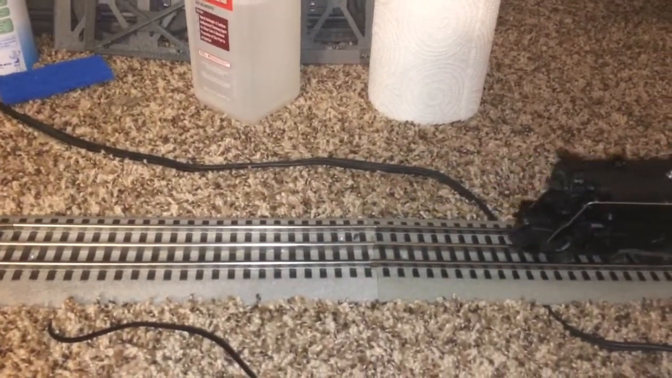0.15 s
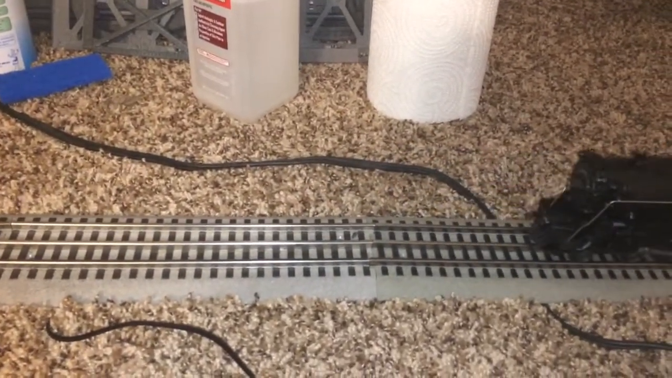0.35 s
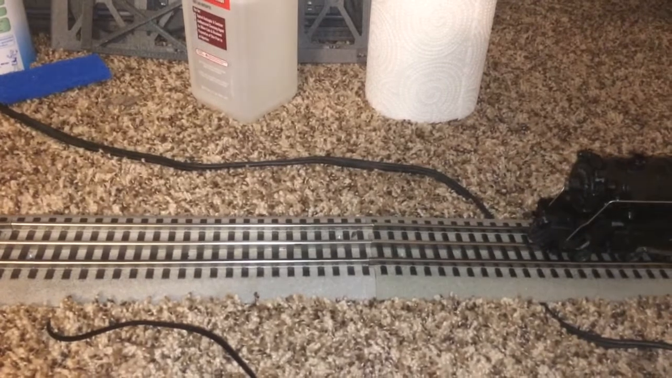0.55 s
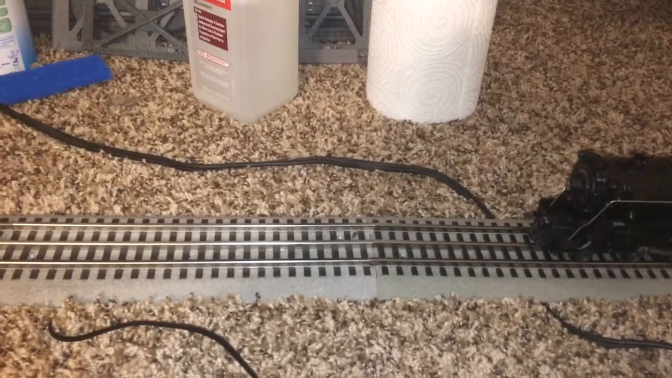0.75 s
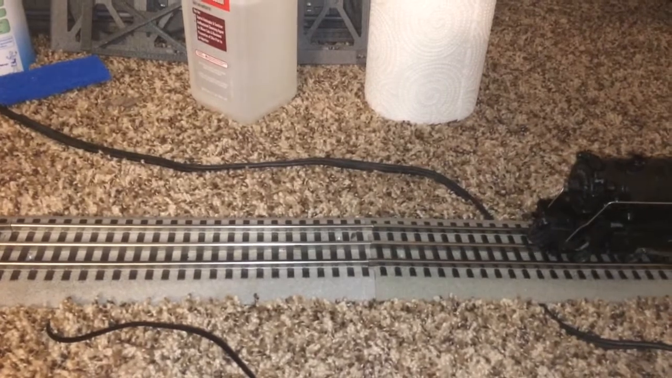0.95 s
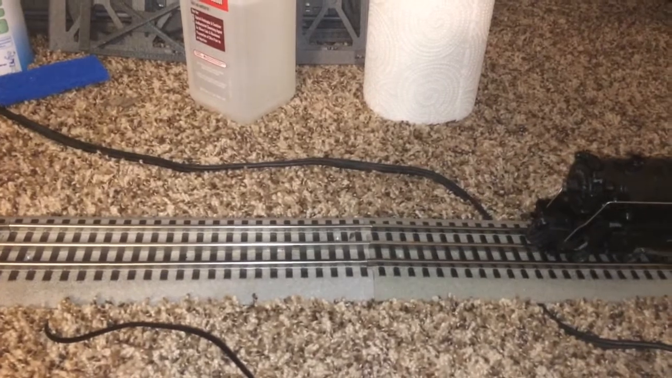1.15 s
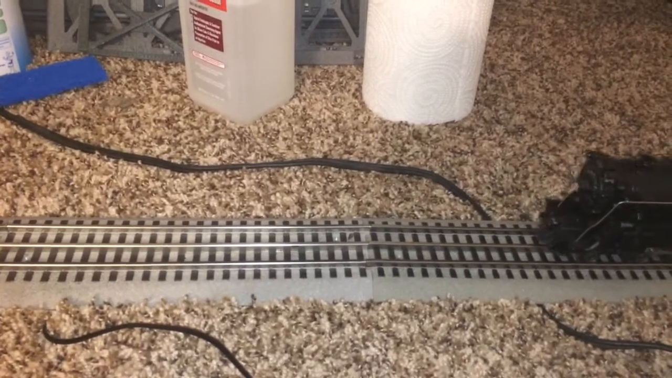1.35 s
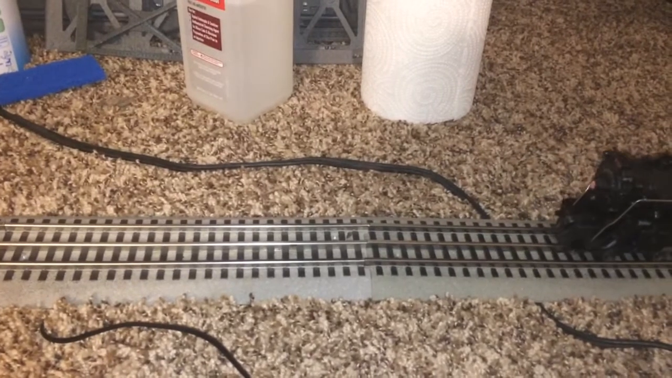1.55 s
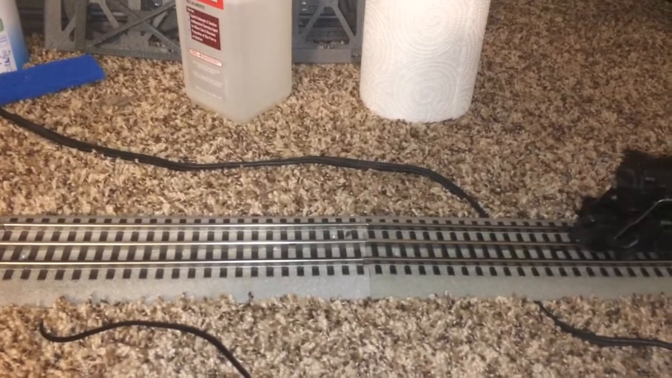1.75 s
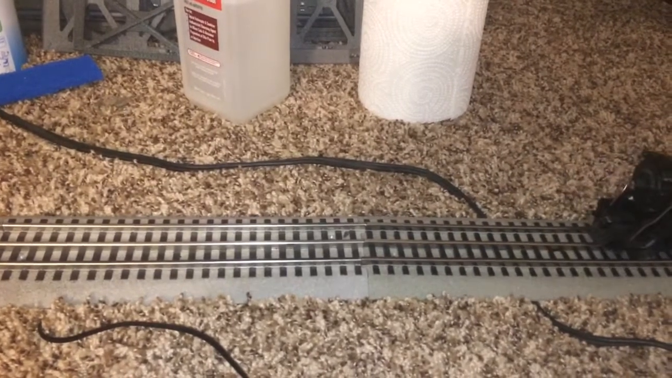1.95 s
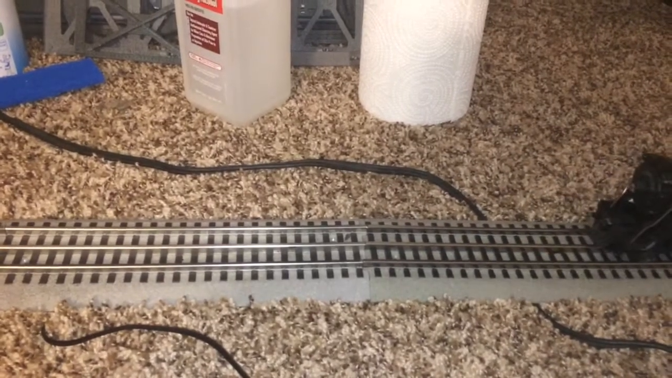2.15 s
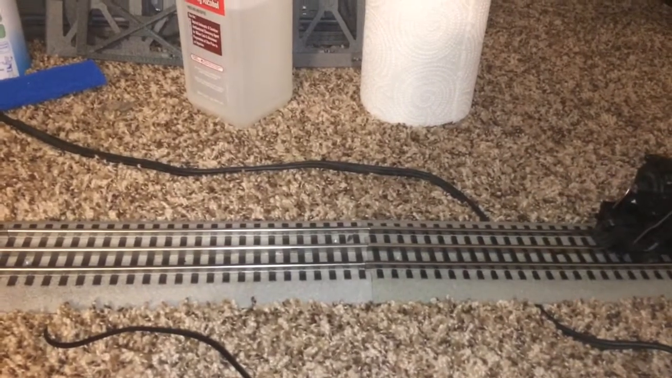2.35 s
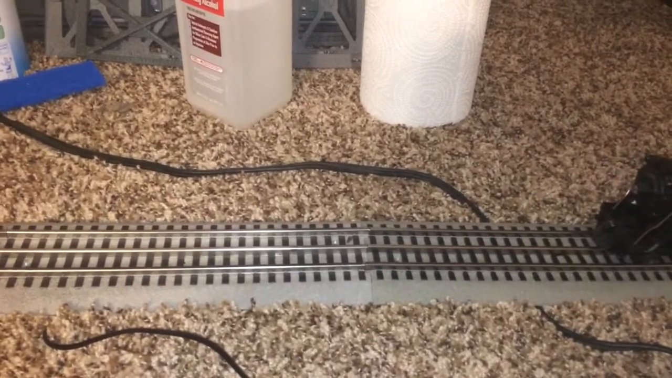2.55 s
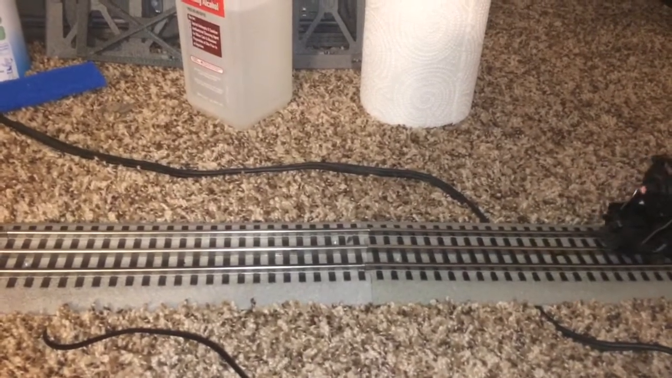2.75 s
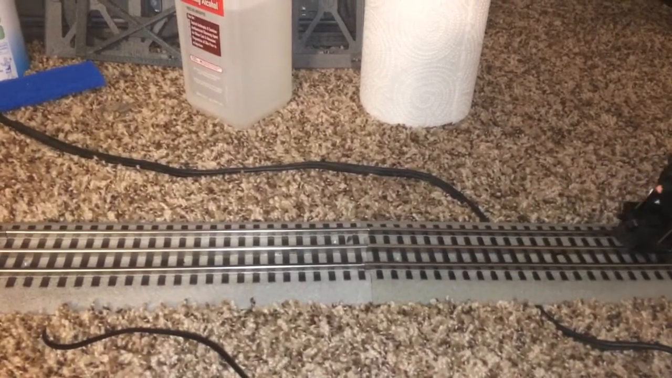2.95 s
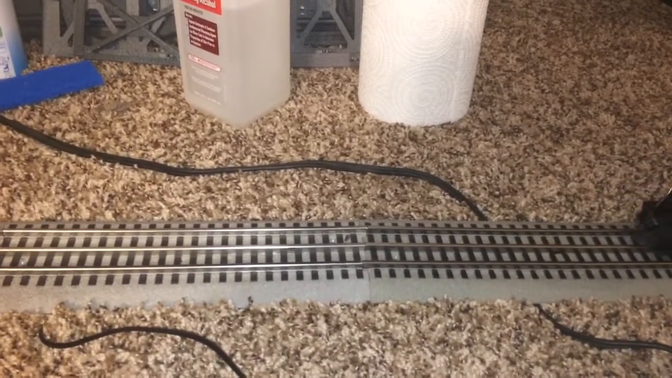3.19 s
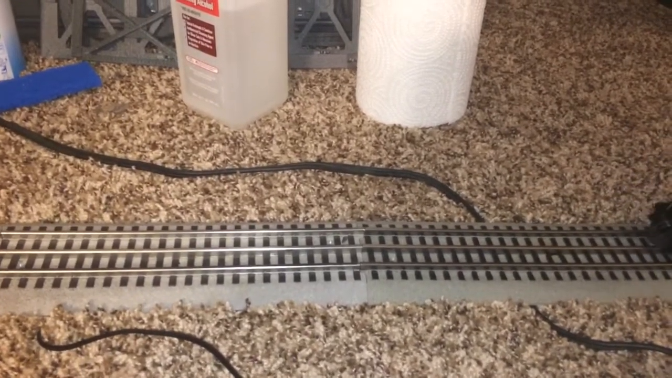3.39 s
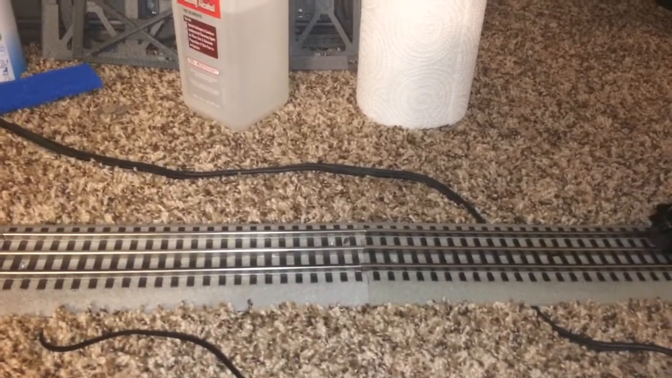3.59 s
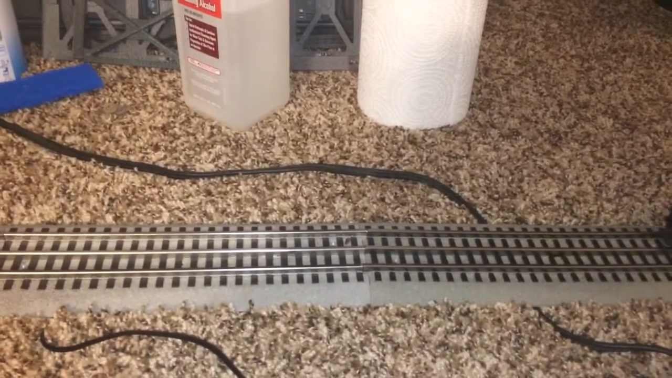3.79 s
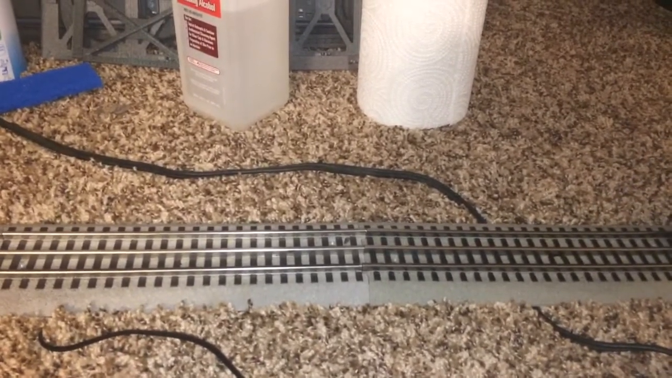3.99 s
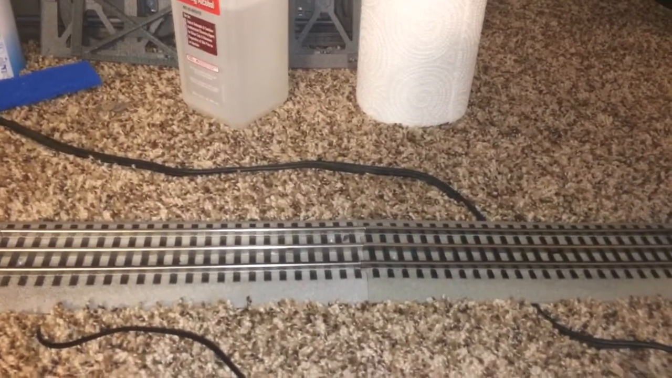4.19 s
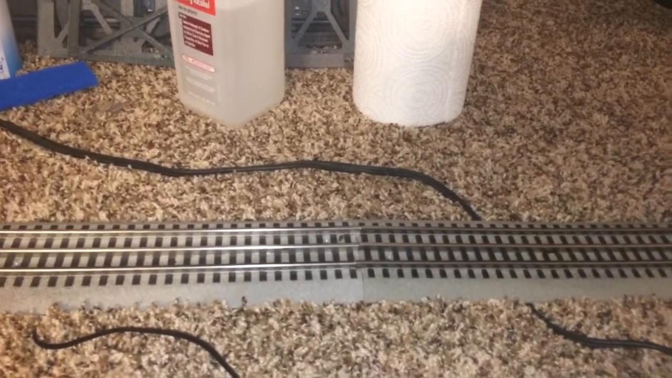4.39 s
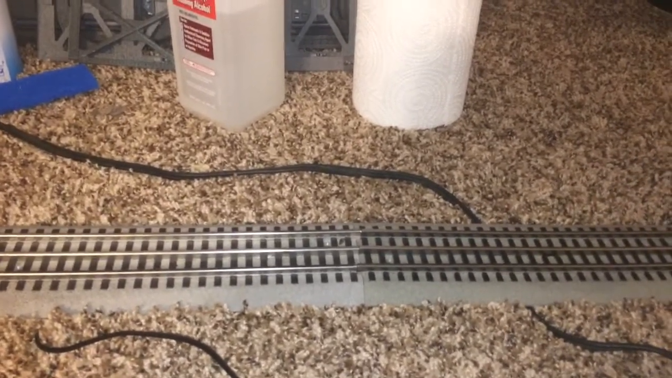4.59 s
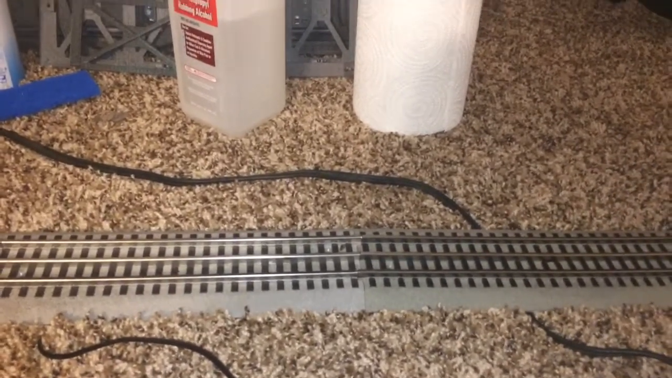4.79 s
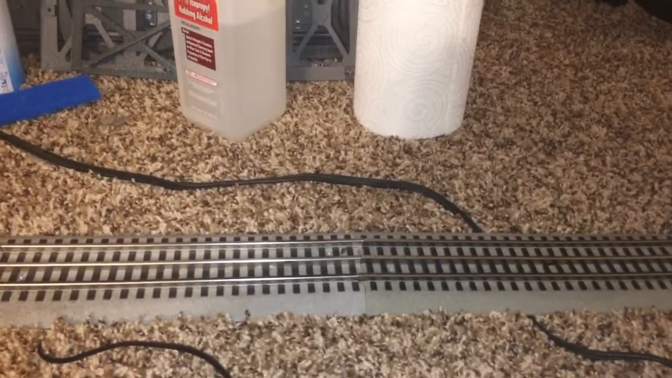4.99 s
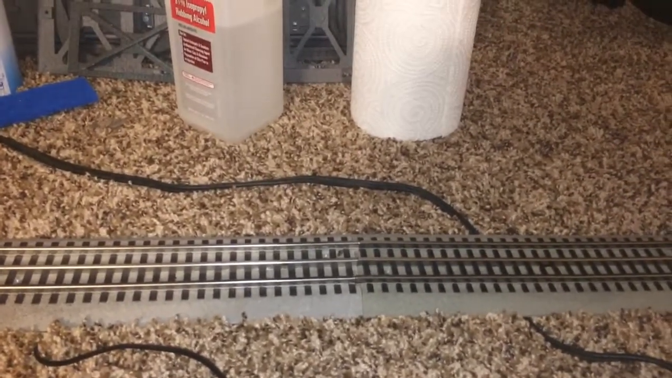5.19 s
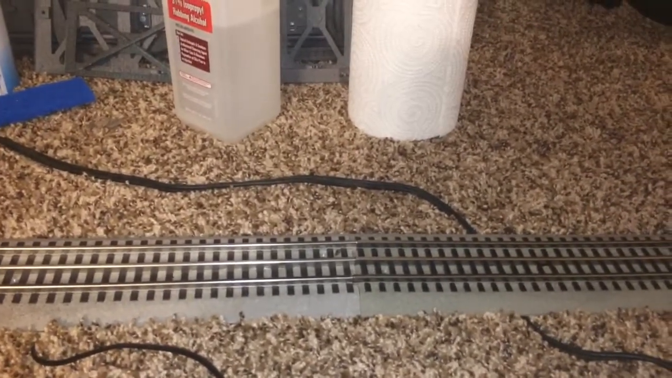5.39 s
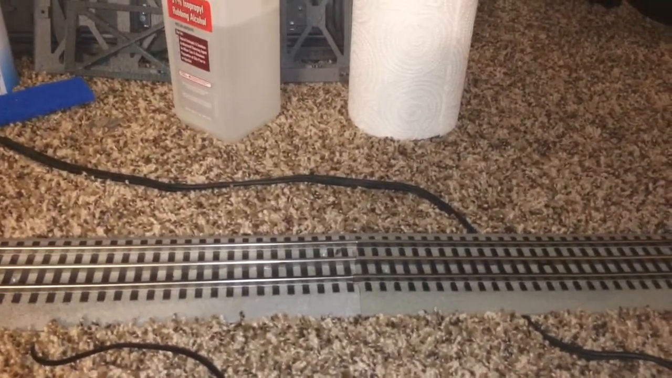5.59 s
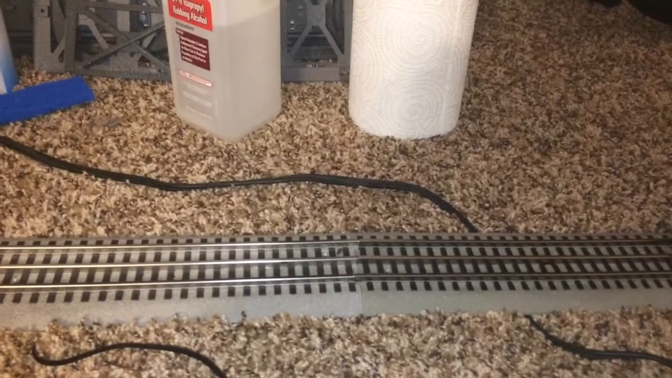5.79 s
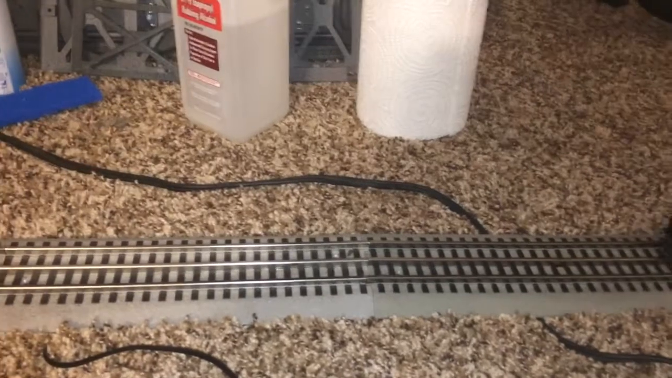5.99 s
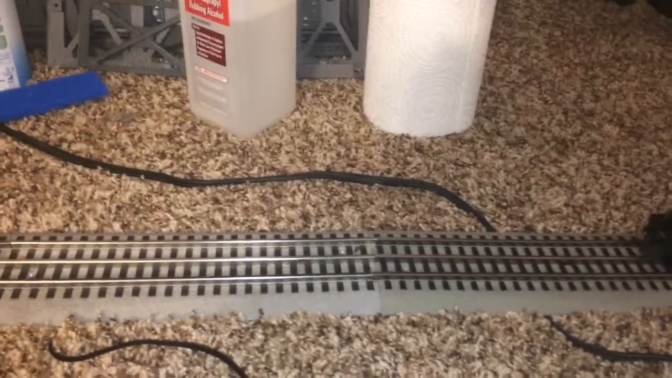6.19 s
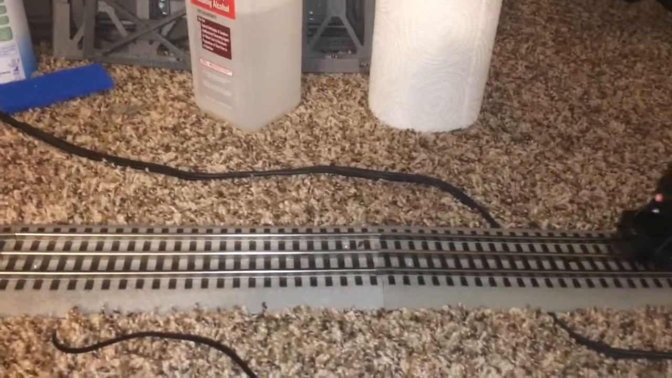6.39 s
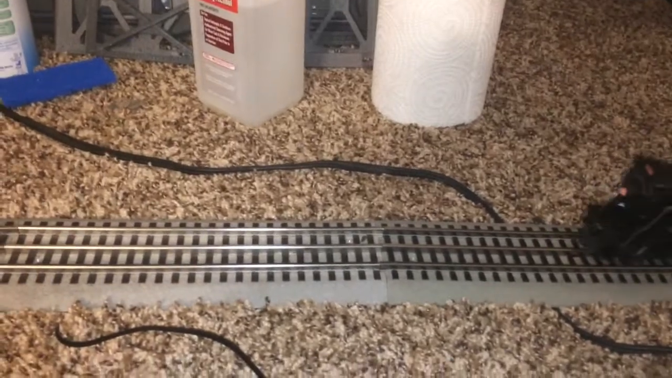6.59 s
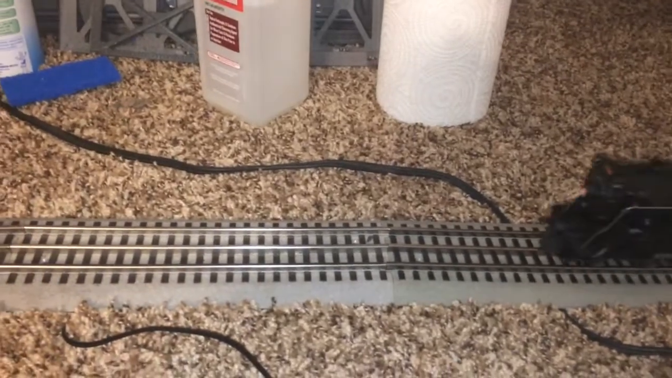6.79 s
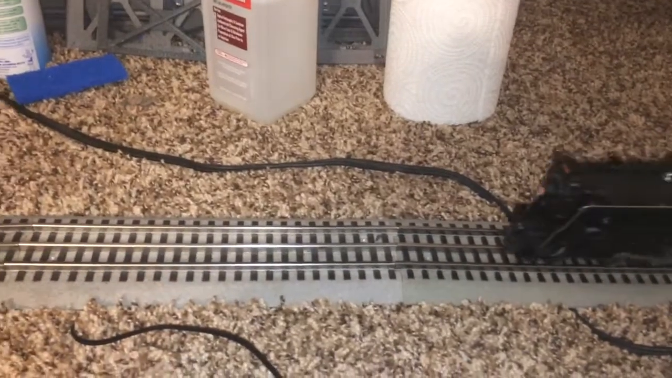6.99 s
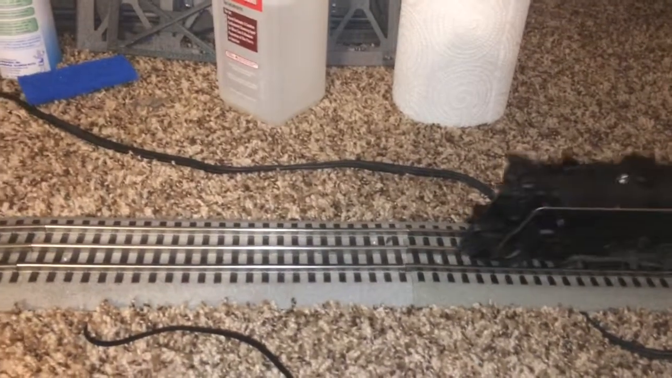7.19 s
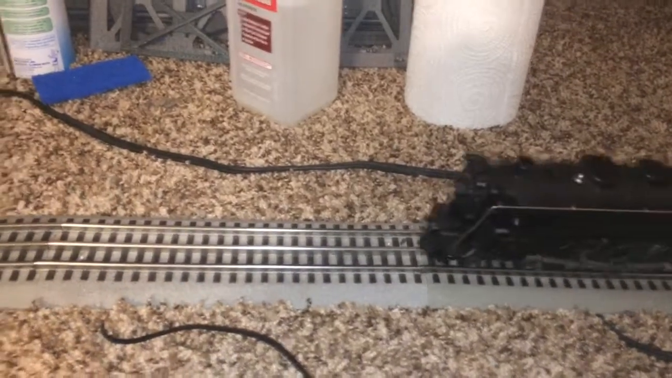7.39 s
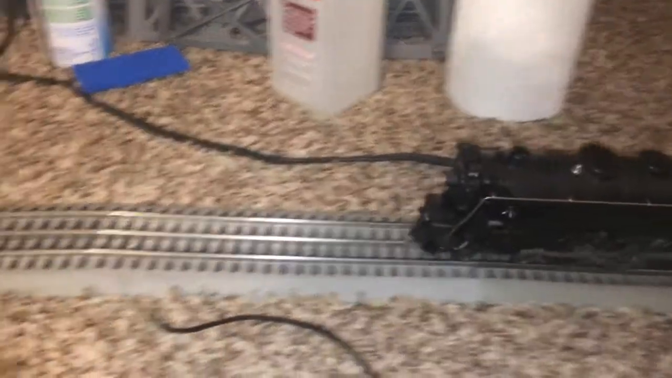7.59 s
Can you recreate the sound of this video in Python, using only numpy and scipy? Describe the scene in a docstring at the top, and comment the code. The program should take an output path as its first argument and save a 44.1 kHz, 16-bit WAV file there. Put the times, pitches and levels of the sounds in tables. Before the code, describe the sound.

A toy metal locomotive lurches in short, harsh gear-chattering bursts with near-silent stalls between, then grinds on steadily along the rails indoors.

```python
"""A die-cast toy locomotive on mains-fed track over carpet lurches four times, stalling between, then runs on.
In each pull, torque pulses at twice the mains rate make the gear teeth chatter and knock in the metal shell;
wheels and pick-ups scrape the rails, and track bed and floor rumble. As each lurch ends, thin gear rings coast
down and, at three of the stops, the wheels whirr. In the final run the armature whines briefly.
Motor hum, faint iron buzz and a quiet room last throughout."""
import sys
import numpy as np
from scipy import signal
from scipy.fft import rfft, irfft
from scipy.io import wavfile
from scipy.ndimage import uniform_filter1d

SR = 44100
rng = np.random.default_rng(int(sys.argv[2]) if len(sys.argv) > 2 else 0)


def generate_wav(signal):
    """Clip the signal to [-1, 1] and save it as 16-bit WAV at the path in sys.argv[1]."""
    frames = np.transpose(np.atleast_2d(signal))
    scaled = np.clip(frames, -1, 1) * 32767
    pcm = np.round(scaled).astype(np.int16)
    wavfile.write(sys.argv[1], SR, pcm)


N = 337365
T = np.arange(N) / SR
TORQUE_HZ = 120.0  # twice the mains rate
LURCH_FREE_DB = -4.5  # tooth blows over rubbing when running free

# resonances of the metal shell: (centre [Hz], width [Hz], level [dB])
SHELL_MODES = [(434.3, 60, -10), (680, 70, -8), (760, 90, -2.5), (920, 130, -2), (1055, 90, 0.5),
               (1190, 190, -3.5), (1440, 45, -7.5)]
# resonances of the thin metal: (centre [Hz], width [Hz], level [dB])
METAL_MODES = [(2160, 280, -5), (2598, 220, 2.5), (3250, 890, 1.5), (4100, 676, 2), (4675, 274, 2.5),
               (5200, 520, -5.5)]
# bands of the pick-up fizz: (centre [Hz], width [Hz], level [dB])
FIZZ_MODES = [(6000, 1620, -1.5), (7830, 1470, 0.5), (9220, 3040, -3.5), (13400, 6300, -15.5)]
# motor pulls: (start [s], end [s])
PULLS = [(-.1, .2), (1.26, 1.84), (2.66, 3.18), (3.62, 4.16), (5.25, 7.7)]


def running():
    """Chatter over steady rubbing rings shell and thin metal; rolling shakes track bed and floor."""
    # track bed resonances: (centre [Hz], width [Hz], level [dB])
    bed_modes = [(167.3, 22.8, -3.5), (346, 470, -14)]
    # floor resonances: (centre [Hz], width [Hz], level [dB])
    floor_modes = [(48.76, 54, -31), (119, 24, -7)]
    # slow changes of colour: (time [s], lift of pick-up fizz [dB], lift of floor thud [dB])
    colour = [(0, -2, 7.5), (.5, 3.5, 4), (1.4, -8, 6), (2.1, -5.5, -8), (2.9, -1.5, -0.5), (3.8, 1, -5),
              (4.5, 1.5, -4), (5.6, -1.5, 11), (6.3, -0.5, -5.5), (6.8, 1, -4.5), (7.25, 4.5, -0.5),
              (7.65, 2.5, 0)]
    shift_db = 1.3  # each resonance swells by itself as the load moves about the frame

    shell_db, scrape_db, bed_db = drive()
    bright_db, deep_db = curves(colour)
    fizz_db = scrape_db - 7.5 + bright_db
    floor_db = -54 + 0.97 * (bed_db + 40) + deep_db + 2 * walk(9.4)
    blows_db = lurch_db()
    # tight and loose spots in the gear train; the whole chatter sinks a little while tooth blows stand out
    load_db = 0.5 * walk(45) - 0.4 * (blows_db - LURCH_FREE_DB)

    lurch = undb(blows_db)
    contacts = chatter(per_s=220, lock=2.0, scatter_db=3.0, decay_s=.0010)
    teeth = (1 + lurch * contacts) / np.sqrt(1 + lurch + lurch ** 2)  # blows and rubbing share the power
    grit = chatter(per_s=600, lock=.3, scatter_db=3.0, decay_s=.0004)

    layers = ((teeth + 0.66, SHELL_MODES, shell_db + load_db),
              (teeth + 0.18 * grit, METAL_MODES, scrape_db + load_db),
              (teeth + 0.17 * grit, FIZZ_MODES, fizz_db + load_db),
              (1, bed_modes, bed_db + 1.87 * walk(8.7)),
              (1, floor_modes, floor_db))
    out = gear_coast(teeth, scrape_db + load_db) + wheel_whirr(grit)
    out = out + tooth_tips(teeth, scrape_db, shift_db)
    for push, modes, level_db in layers:
        ringing = body(push * rng.standard_normal(N), modes, shift_db)
        out = out + undb(level_db) * unit(ringing)
    return out


def drive():
    """Shell chatter, gear scrape and track bed levels follow the spurts and then the final run."""
    # one list per spurt, coast and settling: (time [s], shell chatter [dB], gear scrape [dB], bed rumble [dB])
    spurts = [
        [(0, -33, -39, -46), (.07, -36, -41, -47), (.174, -32.5, -36.5, -43.5), (.225, -45, -47, -45.5),
         (.28, -51, -55.5, -49.5), (.35, -60, -58, -55), (.44, -62, -65.5, -65), (.52, -55, -71, -60),
         (.59, -58, -66, -66), (.73, -80, -82, -80), (1.085, -79.5, -84, -85), (1.12, -74, -77, -60.5),
         (1.16, -67, -79, -69), (1.2, -79, -79, -74)],
        [(1.237, -81, -80, -74), (1.27, -55, -66, -55), (1.3, -49.5, -63, -55), (1.35, -40, -44.5, -49),
         (1.46, -43, -48, -46), (1.55, -35.5, -41, -45.5), (1.59, -42.5, -45, -46.5), (1.81, -40, -41, -47.5),
         (1.875, -63, -58, -57), (1.94, -57, -54, -54), (2.01, -69, -64, -60), (2.065, -53.5, -59, -57),
         (2.15, -55, -71, -49.5), (2.2, -65, -60, -67), (2.31, -82, -83, -75), (2.55, -87, -84, -70),
         (2.6, -79, -80, -65)],
        [(2.64, -87, -81, -64), (2.69, -60, -89, -55), (2.73, -45.5, -47, -44), (2.8, -44, -53, -53),
         (2.84, -31.5, -35, -45), (2.9, -39, -44.5, -45), (3.02, -31, -34, -44.5), (3.06, -39, -44.5, -44),
         (3.1, -33, -36, -38.5), (3.16, -40.5, -44, -40.5), (3.225, -58, -56, -50.5), (3.3, -59.5, -60, -59),
         (3.41, -62, -57.5, -61), (3.485, -68, -73, -69)],
        [(3.53, -57.5, -65, -58), (3.59, -69, -78, -57), (3.62, -50, -59, -57), (3.66, -52, -68, -55),
         (3.68, -44, -57, -40), (3.71, -35.5, -40.5, -47), (3.77, -37, -44, -48), (3.82, -33.5, -38, -41.5),
         (3.95, -32, -35.5, -39.5), (4.12, -31.5, -34, -42), (4.2, -50, -48, -45), (4.34, -55.5, -56, -57),
         (4.48, -68, -59, -57.5), (4.58, -70, -62, -57), (4.63, -58, -66, -59), (4.74, -72, -71, -62),
         (4.84, -81, -82, -86)],
    ]
    # final run: (time [s], shell chatter [dB], gear scrape [dB], bed rumble [dB])
    run = [(5.12, -89, -85, -67.5), (5.23, -77, -76, -67), (5.275, -49, -52, -55), (5.33, -45.5, -79, -52),
           (5.41, -44, -56, -46.5), (5.44, -39, -45.5, -46.5), (5.52, -42, -46, -46),
           (5.6, -35.5, -42, -44), (5.77, -36, -39.5, -45.5), (5.93, -33, -34, -40),
           (6.05, -37, -37, -40.5), (6.2, -36, -40, -41), (6.285, -40, -41.5, -47), (6.45, -35, -38, -41),
           (6.52, -41, -38, -43.5), (6.6, -34.5, -35.5, -49), (6.76, -44, -40.5, -41.5),
           (6.89, -37, -36.5, -43), (6.96, -31, -32, -44.5), (7.03, -34.5, -34.5, -45.5),
           (7.11, -39, -42, -49.5), (7.24, -39, -43.5, -43), (7.37, -41, -43.5, -46),
           (7.52, -41, -42.5, -43), (7.65, -34.5, -38, -46)]
    return curves([row for part in spurts + [run] for row in part])


def lurch_db():
    """Blows stand out as the armature strains off and sink into rubbing as speed builds or power drops."""
    start_db, ease_db_per_s = 1.5, 9.5
    out = np.full(N, LURCH_FREE_DB)
    for on, off in PULLS:
        eased = start_db - ease_db_per_s * (T - on)
        out = np.where((T >= on) & (T < off), np.maximum(eased, LURCH_FREE_DB), out)
    return out


def chatter(per_s, lock, scatter_db, decay_s):
    """Envelope of tooth contacts that bunch on each torque pulse and die exponentially."""
    crowd = np.exp(lock * np.cos(2 * np.pi * TORQUE_HZ * T))
    hit = rng.random(N) < per_s / SR * crowd / crowd.mean()
    size = undb(scatter_db * np.minimum(rng.exponential(size=N), 3.0))
    return unit(tail(hit * size, decay_s))


def tooth_tips(teeth, scrape_db, shift_db):
    """Hard tooth tips tick at random, scaled by the contact envelope, and ring metal and lower fizz bands."""
    ticks_per_s, below_scrape_db = 500, 8
    tips = (rng.random(N) < ticks_per_s / SR) * rng.standard_normal(N) * np.sqrt(teeth)
    ringing = body(tips, METAL_MODES + FIZZ_MODES[:2], shift_db)
    return undb(scrape_db - below_scrape_db) * unit(ringing)


def gear_coast(teeth, level_db):
    """Freewheeling gears ring thin after each pull: a gate opens at its end and closes as they run down."""
    # thin gear rings: (centre [Hz], width [Hz], level [dB])
    coast_modes = [(3400, 240, -1.5), (3900, 400, 0), (4750, 160, -7)]
    rise_s, fall_s, over_scrape_db = 0.093, 0.23, 1.5
    gate = sum(np.clip((T - off) / rise_s, 0, 1) * np.exp(-((T - off) / fall_s) ** 4) for _, off in PULLS)
    return gate * undb(level_db + over_scrape_db) * wavering(teeth, coast_modes)


def wheel_whirr(grit):
    """Wheels whirr up as they drag to a stop: gritty noise in narrow bands under a bell-shaped swell."""
    # wheel resonances: (centre [Hz], width [Hz], level [dB])
    wheel_modes = [(484, 41, 8), (820, 90, -15), (1240, 120, -14), (1710, 100, 2.5)]
    # whirrs: (middle [s], level [dB])
    stops = [(.56, -57), (2.11, -58), (4.72, -64)]
    half_width_s = 0.08  # to 1/e
    swell = sum(undb(db) * np.exp(-((T - s) / half_width_s) ** 2) for s, db in stops)
    return swell * wavering(1.4 * grit + 1, wheel_modes)


def knocks():
    """Gear play and rods: a sharp crack with ping and rattling tail, and a softer push that rings the shell."""
    # distinct knocks, levels ahead of the mix gains:
    # (time [s], metal crack [dB], shell ring [dB], fizz [dB], ping pitch [Hz], ring pitch [Hz])
    distinct_knocks = [(0.019, -20.5, -33, -36, 3730, 1080), (0.0263, -22, -32, -35, 3880, 1050),
                       (0.0359, -21, -34, -42, 3620, 880), (0.0454, -21, -34, -44, 3500, 1170),
                       (0.0709, -26, -27, -44, 3560, 1170), (0.1077, -24, -30, -43, 3770, 1120),
                       (0.119, -17, -24.5, -35, 3650, 1110), (0.135, -21, -29, -42, 3580, 1080),
                       (0.1447, -19.5, -29, -40, 3570, 1030), (0.1813, -27, -34, -44, 3870, 950),
                       (0.1936, -32, -31, -44, 4050, 1130), (0.2184, -22, -34, -41, 3640, 1110),
                       (0.2275, -32, -37, -52, 3650, 1190), (0.2535, -34, -32, -41, 3890, 1110),
                       (0.264, -28, -34, -48, 3650, 1120), (0.288, -32, -37, -51, 3750, 1230),
                       (0.2998, -32, -41, -53, 3880, 1110), (0.339, -49, -60, -61, 3640, 1090),
                       (0.388, -42, -51, -59, 3800, 1170), (0.3944, -40, -53, -65, 3500, 1040),
                       (0.4068, -43, -47, -69, 2860, 1130), (0.421, -48, -53, -72, 3440, 1170),
                       (0.4537, -56, -48, -77, 2860, 1190), (0.4724, -60, -45, -68, 3990, 1070),
                       (0.506, -45, -50, -51, 3480, 1110), (0.5165, -54, -56, -55, 3190, 900),
                       (0.536, -51, -53, -51, 4460, 1110), (0.5707, -48, -50, -50, 3430, 980),
                       (0.5887, -43, -54, -74, 2800, 840), (0.6152, -59, -63, -75, 4100, 890),
                       (0.9618, -73, -71, -87, 3890, 930), (1.005, -65, -65, -74, 3510, 1000),
                       (1.106, -53, -59, -64, 3260, 1230), (1.1304, -57, -53, -69, 4260, 950),
                       (1.2346, -48, -62, -70, 4040, 950), (1.2567, -63, -52, -76, 4410, 970),
                       (1.2733, -50, -50, -64, 3490, 990), (1.285, -36.5, -47, -59, 3620, 930),
                       (1.29, -54, -38, -75, 3760, 1040), (1.3178, -38, -30, -50, 3830, 1020),
                       (1.3377, -32, -28.5, -47, 3830, 1180), (1.344, -30, -38, -53, 3600, 1070),
                       (1.353, -29, -30, -47, 4030, 950), (1.366, -28, -25, -43, 3800, 970),
                       (1.3852, -30, -29, -41, 4290, 920), (1.3974, -29, -37, -50, 3890, 1060),
                       (1.4093, -31, -30, -52, 3800, 940), (1.424, -21, -29, -39, 4330, 940),
                       (1.4357, -25, -32, -44, 3980, 1120), (1.4415, -26, -37, -47, 4000, 970),
                       (1.4535, -32, -36, -50, 3540, 920), (1.476, -25, -29, -43, 3990, 940),
                       (1.4841, -26, -27, -42, 3970, 1010), (1.494, -32, -32, -48, 4210, 1020),
                       (1.5045, -32, -33, -45, 4300, 1050), (1.5132, -30, -32, -45, 3900, 1030),
                       (1.5269, -24, -32, -43, 3720, 980), (1.536, -25, -29, -46, 3750, 1000),
                       (1.5424, -22, -24.5, -37.5, 4300, 1010), (1.5576, -22.5, -30, -42, 4000, 1010),
                       (1.5662, -35, -30, -54, 3450, 1000), (1.5913, -30, -33, -41, 3650, 980),
                       (1.6254, -30, -29, -45, 4340, 980), (1.6332, -24, -29.5, -44, 4270, 1000),
                       (1.6509, -38, -30, -55, 3990, 1030), (1.663, -28, -35, -43, 3290, 1080),
                       (1.6837, -29, -29, -48, 3530, 900), (1.6925, -32, -33, -46, 3200, 940),
                       (1.7033, -32, -37, -40.5, 3570, 1000), (1.7136, -30, -31, -46, 3540, 955),
                       (1.7271, -26, -39, -43, 3850, 1160), (1.745, -27, -34, -46, 3580, 1130),
                       (1.7515, -29, -32, -42, 3720, 980), (1.7707, -33, -37, -49, 3450, 900),
                       (1.7827, -28, -33, -51, 3460, 980), (1.7902, -22, -30, -41, 3660, 1120),
                       (1.8188, -24, -30, -38, 4250, 1080), (1.8292, -38, -37, -55, 4540, 1050),
                       (1.8512, -39, -44, -57, 3890, 1050), (1.916, -43, -41, -61, 3740, 1210),
                       (1.9545, -36, -49, -66, 4110, 830), (1.9783, -51, -53, -71, 4370, 1100),
                       (2.0216, -54, -49, -69, 3130, 1030), (2.0317, -45, -55, -45.5, 4610, 1190),
                       (2.0489, -30.5, -34, -59, 2740, 1140), (2.0577, -34, -41, -54, 3230, 1070),
                       (2.0743, -51, -40, -59, 4450, 1180), (2.129, -45, -44, -50, 3410, 1300),
                       (2.1777, -56, -54, -51, 3370, 1010), (2.2255, -54, -51, -71, 3810, 1070),
                       (2.4801, -60, -71, -83, 3610, 1070), (2.5635, -57, -70, -73, 3830, 950),
                       (2.584, -62, -58, -75, 3780, 960), (2.6522, -38.5, -62, -65, 4190, 1120),
                       (2.6834, -42, -37, -62, 3400, 1140), (2.7171, -39, -41, -57, 3700, 1030),
                       (2.724, -28, -40, -52, 3500, 1080), (2.735, -29, -29, -49, 4270, 1090),
                       (2.7566, -32, -38, -60, 3600, 940), (2.766, -40.5, -33.5, -58, 3690, 1000),
                       (2.7844, -28, -35, -52, 3860, 960), (2.7933, -34, -34, -54, 3740, 1020),
                       (2.8159, -30, -33, -53, 3430, 990), (2.8265, -27, -33, -41, 3950, 1100),
                       (2.832, -26, -30, -46, 4130, 980), (2.8437, -20, -40, -43, 3990, 1220),
                       (2.8595, -30, -24, -45, 4110, 1040), (2.8681, -26, -27, -42, 3790, 990),
                       (2.9027, -34, -30, -51, 3770, 930), (2.9257, -28, -31, -43, 3470, 1010),
                       (2.9399, -33, -40, -51, 4110, 870), (2.951, -28, -35, -45, 3720, 950),
                       (2.9608, -21, -23, -38, 4210, 920), (2.9828, -21, -31, -46, 3850, 1070),
                       (3.0418, -21, -26, -42, 3590, 1030), (3.068, -29, -25, -47, 3290, 1070),
                       (3.0843, -18, -34, -38, 3400, 1180), (3.0921, -20, -26, -34, 3410, 960),
                       (3.1102, -27, -30, -40, 3660, 1020), (3.134, -32, -35, -48, 3590, 940),
                       (3.1438, -24, -34, -41, 3700, 960), (3.1596, -24, -31, -46, 3480, 870),
                       (3.1718, -28, -43, -51, 3320, 1000), (3.187, -33, -48, -51, 4410, 1080),
                       (3.236, -37, -47, -60, 3490, 970), (3.2609, -40, -44, -59, 3880, 910),
                       (3.3193, -36, -48, -61, 4080, 1160), (3.3735, -36, -48, -63, 3590, 1200),
                       (3.4016, -36, -48, -47, 4600, 940), (3.509, -40, -47, -58, 3550, 1270),
                       (3.5224, -36, -54, -61, 2940, 990), (3.542, -46, -52, -57, 3980, 1060),
                       (3.5522, -53, -50, -69, 3640, 1090), (3.5704, -48, -50, -64, 3080, 940),
                       (3.6057, -35, -54, -54, 4310, 920), (3.6153, -47, -44, -64, 3500, 1020),
                       (3.6343, -46, -45, -61, 3850, 920), (3.6666, -34, -27, -51, 3620, 1030),
                       (3.6745, -34, -31, -57, 3790, 980), (3.6807, -33, -30, -59, 3170, 970),
                       (3.6993, -24, -22.5, -43, 4190, 925), (3.7115, -33, -32, -51, 3720, 1140),
                       (3.7655, -31, -27, -38, 3810, 940), (3.7845, -29, -33, -55, 3550, 1120),
                       (3.8096, -20.5, -24.5, -40, 3600, 830), (3.8578, -21, -22.5, -35, 3980, 990),
                       (3.8821, -19, -27, -49, 3700, 890), (3.917, -26, -28, -38, 3800, 1230),
                       (3.9285, -23, -28, -40, 3600, 970), (3.9501, -18.5, -29, -36, 3750, 880),
                       (3.9582, -19, -20.5, -35, 3860, 960), (4.0267, -26, -32, -42, 4080, 1040),
                       (4.093, -31, -20.5, -40, 3740, 1090), (4.124, -16, -25, -38, 3570, 1050),
                       (4.152, -29, -24.5, -46, 3730, 1050), (4.2427, -35, -36, -55, 3470, 880),
                       (4.2888, -35, -45, -51, 3460, 1050), (4.3172, -42, -43, -64, 3850, 1120),
                       (4.3381, -45, -48, -58, 3950, 900), (4.3687, -36, -45, -59, 3570, 1100),
                       (4.401, -47, -48, -64, 3630, 1210), (4.4809, -44, -51, -65, 3900, 1040),
                       (4.489, -39, -54, -63, 3640, 960), (4.5072, -50, -46, -69, 3610, 1130),
                       (4.5634, -50, -45.5, -64, 3880, 1110), (4.6124, -46, -48, -46.5, 4180, 1160),
                       (4.6272, -50, -42, -60, 3890, 1000), (4.636, -40.5, -53, -67, 2860, 980),
                       (4.6918, -51, -49, -60, 3380, 920), (4.7263, -51, -58, -69, 3120, 850),
                       (5.0804, -62, -75, -77, 4570, 1230), (5.1185, -49.5, -60, -70, 3400, 1050),
                       (5.2015, -65, -62, -82, 3280, 790), (5.246, -53, -50, -64, 3670, 1060),
                       (5.28, -31.5, -33.5, -45.5, 3370, 1010), (5.2945, -52, -38, -68, 2910, 1070),
                       (5.3197, -28, -24, -46, 3500, 1140), (5.3267, -25, -32, -46, 3650, 1160),
                       (5.3595, -34, -25.5, -47, 3500, 1090), (5.3845, -29, -26, -43.5, 3910, 1130),
                       (5.3926, -29, -40, -60, 3400, 970), (5.4254, -19, -22, -34, 3800, 1100),
                       (5.434, -28, -33, -51, 3680, 1140), (5.4575, -32, -39, -54, 3380, 970),
                       (5.4662, -35, -33, -49, 3710, 1040), (5.4834, -29, -29, -41, 3650, 1130),
                       (5.501, -28, -41, -54, 3520, 900), (5.5278, -28, -34, -51, 3810, 970),
                       (5.5423, -29, -33, -49, 4060, 1040), (5.5536, -29, -27, -39.5, 4000, 1060),
                       (5.5861, -21, -24, -36, 4100, 1050), (5.6205, -30, -41, -47, 3840, 1250),
                       (5.652, -29, -31, -43, 3540, 980), (5.658, -28, -25.5, -46, 3690, 960),
                       (5.6926, -26, -30, -47, 3670, 1110), (5.739, -26, -31, -45, 3440, 1070),
                       (5.784, -26, -27, -44, 3450, 1040), (5.802, -27, -30, -41, 4450, 1040),
                       (5.82, -23, -41, -49, 3500, 1080), (5.8254, -35, -26.5, -52, 3250, 1040),
                       (5.8445, -26, -41, -44, 3610, 1080), (5.8538, -23, -25, -42, 3510, 1020),
                       (5.8744, -19, -28, -37, 3700, 960), (5.8945, -23, -29, -40, 3580, 1040),
                       (5.928, -19, -36, -39, 3570, 1190), (5.9511, -20, -34, -45, 3400, 895),
                       (6.0354, -23, -30, -41, 3660, 1070), (6.077, -17.5, -22.5, -39, 3620, 900),
                       (6.1288, -36, -29, -51, 3800, 980), (6.1438, -24, -37, -51, 3470, 950),
                       (6.1508, -26, -23, -50, 3990, 920), (6.1941, -14, -27, -37, 3730, 1020),
                       (6.2105, -24, -27, -48, 3400, 930), (6.2939, -25, -36, -48, 3500, 930),
                       (6.3107, -20, -24.5, -41, 3350, 1040), (6.3698, -21, -30, -45, 3370, 980),
                       (6.411, -25, -38, -51, 3550, 1050), (6.4286, -22, -33, -51, 3680, 1050),
                       (6.4763, -25, -32, -42, 3770, 1040), (6.5453, -27, -28, -49, 3800, 1000),
                       (6.6093, -20, -25, -34, 4040, 1080), (6.6594, -19, -37, -43, 3500, 900),
                       (6.7227, -30, -27, -44, 3640, 970), (6.7507, -33, -38, -50, 3940, 1040),
                       (6.7713, -28, -33, -45, 3890, 980), (6.7858, -26, -29, -39, 3960, 960),
                       (6.83, -25, -30, -37, 4150, 1110), (6.8436, -22, -33, -39, 3330, 1150),
                       (6.8647, -23, -37, -41, 3580, 1070), (6.902, -31, -24, -44, 4060, 1070),
                       (6.9807, -23, -23.5, -29, 3830, 1010), (6.996, -25, -28, -44, 3850, 990),
                       (7.0197, -22, -24, -36, 3690, 1120), (7.0436, -25, -23, -34, 3660, 950),
                       (7.079, -24.5, -34, -41, 3500, 1030), (7.1367, -29, -30, -44, 3730, 1000),
                       (7.1437, -26, -32, -47, 3500, 1070), (7.2017, -36, -27, -44, 3140, 940),
                       (7.3959, -34, -30, -47, 3530, 814), (7.4256, -32.5, -28, -46, 3880, 1100),
                       (7.5013, -33, -28, -42, 4250, 1030), (7.5172, -33, -26, -44, 3330, 1040),
                       (7.5507, -26, -24, -43, 3640, 980), (7.6005, -28, -28, -39, 3480, 1000)]
    s, crack_db, ring_db, fizz_db, ping_hz, ring_hz = np.r_[rattle(), distinct_knocks].T
    at = (s * SR).astype(int)
    crack, fizz = np.zeros((2, N))
    crack[at], fizz[at] = undb(crack_db), undb(fizz_db)

    crack_env = tail(crack, 0.0018) + undb(-11.0) * tail(crack, 0.010)
    metal = body(crack_env * rng.standard_normal(N), METAL_MODES)
    fizz_env = tail(fizz, 0.0016) + undb(-11) * tail(fizz, 0.014)
    spit = body(undb(12) * fizz + fizz_env * rng.standard_normal(N), FIZZ_MODES)
    ping = bursts(s, crack_db, ping_hz, rise_s=.0001, fall_s=.0009)
    push = bursts(s, ring_db, ring_hz, rise_s=.0007, fall_s=.002)  # teeth roll into contact

    bright = undb(-6) * metal + undb(-2) * ping + undb(11) * spit
    return bright + undb(1.0) * push + undb(-23.0) * body(push, SHELL_MODES)


def rattle():
    """Rows of further knocks at random times, as strong as the gears then run."""
    per_s, scatter_db = 15, 2
    ping_centre_hz, ping_log_spread = 3620, 0.065
    ring_centre_hz, ring_log_spread = 1070, 0.13
    count = int(per_s * N / SR)
    s = rng.random(count) * N / SR
    crack, ring, fizz, spot, side = rng.standard_normal((5, count))
    shell_db, scrape_db, _ = (np.interp(s, T, level) for level in drive())
    return np.c_[s,
                 scrape_db + 4.0 + scatter_db * crack,
                 shell_db + 3.5 + scatter_db * ring,
                 scrape_db - 4.5 + scatter_db * fizz,
                 ping_centre_hz * np.exp(ping_log_spread * spot),
                 ring_centre_hz * np.exp(ring_log_spread * side)]


def bursts(s, db, hz, rise_s, fall_s):
    """At each time a few cycles swell and die, at the pitch of the spot that was struck."""
    t, out = T[:SR // 70], np.zeros(N + SR)
    swell = (1 - np.exp(-t / rise_s)) ** 2 * np.exp(-t / fall_s)
    swell = swell / swell.max()
    for at, gain, f in zip((s * SR).astype(int), undb(db), hz):
        out[at:at + len(t)] += gain * swell * np.sin(2 * np.pi * f * t)
    return out[:N]


def motor_tones():
    """Magnetic hum on multiples of the torque rate, the armature's whine and the buzz of the iron."""
    return motor_hum() + armature_whine() + iron_buzz()


def motor_hum():
    """Partials of the torque rate, the higher ones wavering more, the third changing level."""
    # hum partials: (multiple of torque rate [1], RMS level [dB])
    partials = [(2, -63.5), (3, -64), (4, -78), (5, -88), (6, -83), (12, -91)]
    # third partial: (time [s], level change [dB])
    third_change = [(0, 1.5), (.94, 0), (1.02, -6), (2.2, -9), (2.62, -5), (3.42, -9), (3.52, -5),
                    (4.7, -4), (4.93, -8), (5.16, -6)]
    third_db, = curves(third_change)
    hum = np.zeros(N)
    for k, db in partials:
        level_db = db + k / 4 * walk(8) + (k == 3) * third_db
        hum += undb(level_db) * np.sin(2 * np.pi * (k * TORQUE_HZ * T + rng.random()))
    return np.sqrt(2) * hum


def armature_whine():
    """The armature whines briefly through the track bed: one sine of gliding pitch and fluttering level."""
    # whine: (time [s], pitch [Hz], RMS level [dB])
    glide = [(5.75, 160.4, -43), (5.796, 167, -38), (5.83, 156.5, -51), (5.898, 169, -37.5),
             (6.05, 176.6, -43), (6.098, 194.7, -40), (6.199, 192, -50)]
    hz, db = curves(glide)
    fade = np.clip(np.minimum(T - glide[0][0], glide[-1][0] - T) / 0.026, 0, 1)
    tone = np.sin(2 * np.pi * np.cumsum(hz) / SR)
    return np.sqrt(2) * fade * undb(db + 3.3 * walk(40)) * tone


def iron_buzz():
    """Loose laminations rattle once per magnetic pull: pulsed noise through their resonances."""
    # lamination resonances: (centre [Hz], width [Hz], level [dB])
    coil_modes = [(4420, 60, 0), (5130, 40, -4), (7560, 500, -11)]
    pull = np.exp(1.3 * np.cos(2 * np.pi * TORQUE_HZ * T))
    return undb(-85) * unit(body(pull * rng.standard_normal(N), coil_modes))


def room():
    """Smooth hiss and low murmur of the house: noise shaped by a spectrum drawn over log frequency."""
    # room spectrum: (frequency [Hz], relative density [dB per Hz])
    spectrum = [(25, -25), (45, 14.5), (120, 7.5), (260, 5), (420, 11), (600, 0.5), (1000, -18), (1600, -7),
                (2000, -4), (3000, -26), (4600, -12.5), (6000, -10.5), (10000, -13), (16000, -13.5)]
    hz, db = np.transpose(spectrum)
    f = np.maximum(np.arange(N // 2 + 1) * SR / N, 1)
    gain = undb(np.interp(np.log(f), np.log(hz), db))
    return undb(-73) * unit(irfft(rfft(rng.standard_normal(N)) * gain, N))


def carpet_echo(dry_train):
    """A carpeted room's short, dull, diffuse echo: decaying low-passed noise, convolved."""
    t = T[:SR // 3]
    decay = undb(-60 * t / 0.29) * (t > .004)
    echo = signal.lfilter([.5], [1, -.5], rng.standard_normal(len(t))) * decay
    return signal.fftconvolve(dry_train, echo / np.sqrt(np.sum(echo ** 2)))[:N]


def undb(db):
    """Decibels to amplitude."""
    return 10 ** (np.asarray(db) / 20)


def unit(x):
    """Scale to RMS 1."""
    return x / np.sqrt(np.mean(x ** 2))


def band(x, hz, width):
    """Two-pole resonance, gain 1 at the centre."""
    return signal.lfilter(*signal.iirpeak(hz, hz / width, fs=SR), x)


def body(x, modes, shift_db=0.):
    """Sum of resonances; overlapping neighbours in opposite phase fill their gap, lone ones keep a valley."""
    hz, width, db = np.transpose(modes)
    overlaps = np.diff(hz) < width[1:] + width[:-1]
    signs = np.cumprod(np.r_[1, np.where(overlaps, -1, 1)])
    out = 0
    for sign, f, w, level_db in zip(signs, hz, width, db):
        if shift_db:
            level_db = level_db + shift_db * walk(14)
        out = out + sign * undb(level_db) * band(x, f, w)
    return out


def wavering(push, modes):
    """Thin resonances that each swell and fade on their own."""
    out = 0
    for hz, width, db in modes:
        ring = band(push * rng.standard_normal(N), hz, width)
        out = out + undb(db + 3.0 * walk(14)) * ring
    return unit(out)


def tail(x, seconds):
    """Every impulse becomes an exponential envelope of the same peak."""
    return signal.lfilter([1], [1, -np.exp(-1 / (seconds * SR))], x)


def walk(rate_hz):
    """Random levels held 1 / rate_hz and slewed twice; RMS 1."""
    k = int(SR / rate_hz)
    steps = np.repeat(rng.standard_normal(N // k + 1), k)
    return unit(uniform_filter1d(uniform_filter1d(steps, k), k)[:N])


def curves(table):
    """Columns of a table joined by straight lines in time."""
    s, *columns = np.transpose(table)
    return [np.interp(T, s, c) for c in columns]


def scene():
    """Train with its echo, over motor tones and room."""
    train = running() + knocks()
    return (train + undb(-14.5) * carpet_echo(train) + motor_tones() + room())[None]


def record(dry):
    """The phone cuts the top: a steep elliptic low-pass."""
    top_hz = 15900
    return signal.sosfilt(signal.ellip(10, .2, 80, top_hz, fs=SR, output="sos"), dry)


dry = scene()
out = record(dry)
generate_wav(out)
```